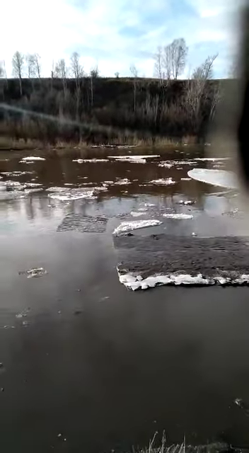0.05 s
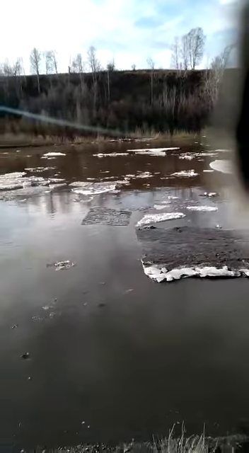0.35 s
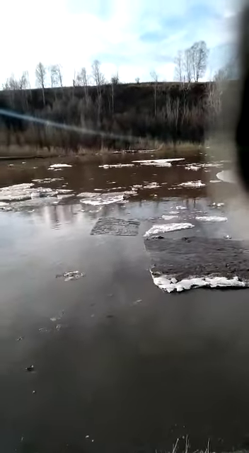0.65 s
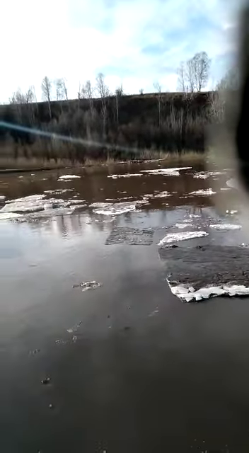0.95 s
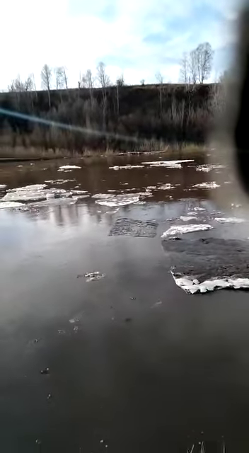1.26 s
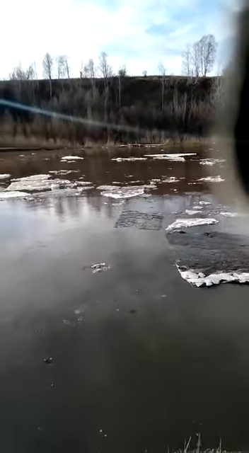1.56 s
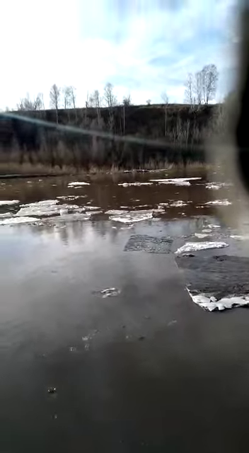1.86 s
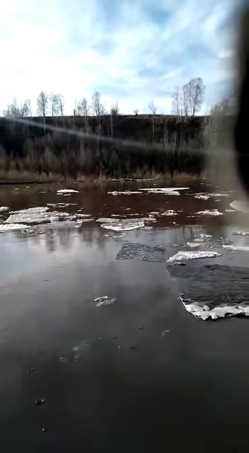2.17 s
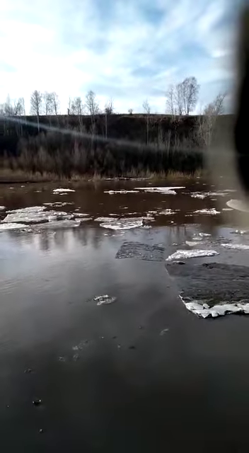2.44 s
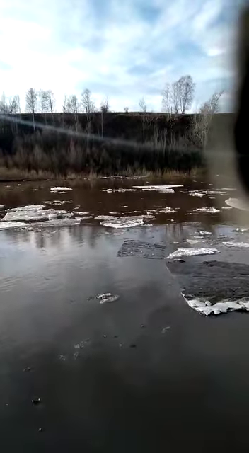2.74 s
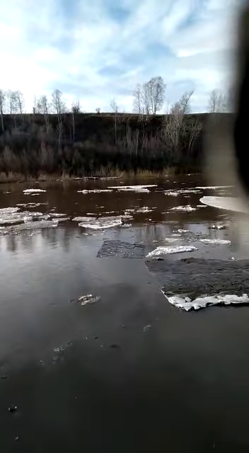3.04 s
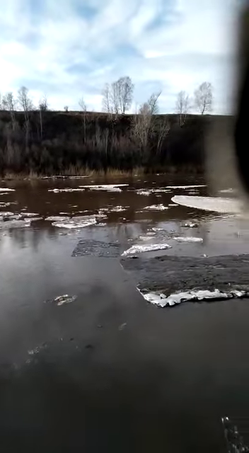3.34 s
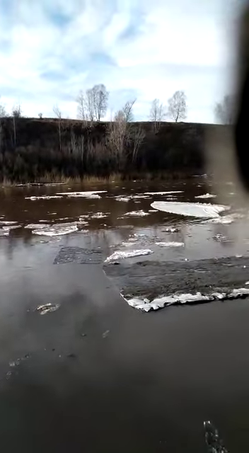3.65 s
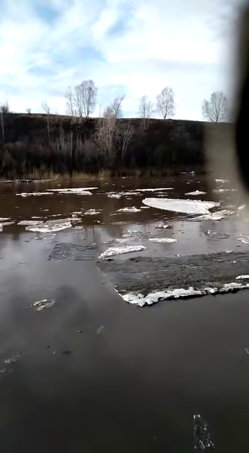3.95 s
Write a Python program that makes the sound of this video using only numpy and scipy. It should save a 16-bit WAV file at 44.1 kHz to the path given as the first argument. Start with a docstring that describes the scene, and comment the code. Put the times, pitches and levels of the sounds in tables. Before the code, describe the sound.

Low wind buffets a hand-held microphone, with soft handling noise and a very faint river.

```python
"""Gusty wind rumbles and thumps on a hand-held phone, above a slow river that carries ice.
Eddies sweep past the two microphone ports, each on its own, and a few hit as blunt buffets.
Close up, a finger rubs, knocks and ticks on the case.
Far back in the mix, small bubbles ring as drips and the river murmurs under a fine spray."""
import sys
import numpy as np
from scipy import signal
from scipy.fft import rfft, irfft
from scipy.io import wavfile
from scipy.ndimage import uniform_filter1d, map_coordinates

SR = 44100
rng = np.random.default_rng(int(sys.argv[2]) if len(sys.argv) > 2 else 0)


def file_out(sig):
    """Save sig as 16-bit WAV at sys.argv[1]."""
    # one column per channel
    cols = np.atleast_2d(sig).T
    # limit, then scale
    lim = np.clip(cols, -1, 1)
    pcm = np.round(lim * 32767).astype(np.int16)
    wavfile.write(sys.argv[1], SR, pcm)


N = 176400

# Gust envelope at each port, ahead of flicker and trim: time_s, level_db
GUSTS_LEFT = [(0, -50), (0.848, -41), (1.028, -34), (1.109, -25.5), (1.221, -34.5), (1.338, -27),
              (1.559, -38), (1.899, -28.5), (2.018, -40.5), (2.45, -50), (2.772, -36.5), (2.95, -46.5),
              (3.2, -46), (3.36, -31), (3.551, -50.5), (3.798, -29.5), (3.902, -36.5), (4, -36)]
GUSTS_RIGHT = [(0, -25), (0.118, -27.5), (0.259, -24.5), (0.698, -27), (0.952, -32), (1.25, -37),
               (1.361, -32), (1.501, -48.5), (1.651, -36), (1.802, -41), (1.989, -32), (2.079, -42),
               (2.4, -54), (2.849, -40), (3.08, -40.5), (3.399, -36.5), (3.851, -40), (4, -37.5)]
# Tone of the turbulence at a sweep speed of 1: frequency_hz, gain_db
EDDY_EQ = [(12, 1), (30, 8), (70, 1.5), (120, -3), (200, -11), (300, -22), (450, -41), (700, -53.5),
           (1400, -82.5)]
# Single vortex hits: centre_s, peak_db, half_width_s, flutter_db, pan_db (left minus right)
VORTEX_HITS = [(.008, -22.5, 0.0009, -26.5, -7.5), (0.089, -23.5, 0.0034, -57, -36),
               (0.154, -19.5, 0.001, -43, -41), (.237, -18, 0.0012, -29, -23),
               (0.2578, -14.5, 0.00092, -26, -32), (.449, -20.5, 0.00084, -45, -27),
               (0.492, -30.5, 0.00088, -47, -20), (0.672, -19, 0.0011, -34.5, -39),
               (.724, -23, 0.0011, -48, -24), (0.803, -28.5, 0.0026, -45, -12),
               (1.101, -18, .0026, -34.5, 20), (1.258, -30.5, 0.0014, -44, -19.5),
               (1.317, -17, 0.0018, -40, 29), (1.38, -25, 0.0023, -41.5, 0.5),
               (1.66, -28.5, 0.0018, -49, -10), (1.7275, -14, 0.0016, -28.5, 32.5),
               (1.873, -15.5, 0.0035, -50, 31), (1.998, -20, 0.0012, -34, -23),
               (2.12, -29.5, 0.0042, -54.5, 10), (3.202, -28.5, .002, -51, -18),
               (3.3062, -21.5, 0.0016, -42, 20), (3.391, -23, 0.0029, -49.5, 15),
               (3.7779, -12.5, 0.0019, -25.5, 23.5), (3.790, -18, .0035, -35, 29),
               (3.819, -19.5, 0.002, -39, 28), (3.972, -25, 0.0037, -56, -14.5)]
# Tone of the flutter around a vortex: frequency_hz, gain_db
FLUTTER_EQ = [(50, -2), (110, 0.5), (200, -4.5), (330, -5), (450, -17.5), (700, -32.5), (1200, -53),
              (3000, -84)]
# Finger sliding on the case: start_s, length_s, level_db, swell_db, pan_db
RUB_STROKES = [(0.062, 0.021, -72.5, -23.5, -2), (0.087, 0.024, -69.5, 6, 7), (0.176, 0.11, -59.5, 7.5, 6),
               (0.29, 0.14, -54, 5.5, 6), (0.429, 0.15, -57.5, -10, 8), (.58, 0.31, -82.5, 0.5, 9),
               (0.633, 0.0072, -68.5, 5, 11), (.657, 0.018, -65, 2.5, 10), (.685, 0.043, -66.5, 3, 8),
               (0.763, 0.031, -66.5, 3, 9), (0.801, 0.012, -72, 0, 7), (0.913, 0.1, -78, -3, 3.5),
               (1.034, 0.031, -66.5, -7, 8), (1.395, 0.015, -73.5, 1.5, 9), (2.789, 0.022, -73.5, -12, 4.5),
               (2.833, 0.065, -76, 13, 8), (2.904, 0.048, -64.5, -5, 9), (3.294, 0.15, -84, -3, 10)]
# Tone of the friction hiss: frequency_hz, gain_db
RUB_EQ = [(300, -1), (700, 3), (1100, 2), (1600, 0), (2200, 3.5), (3100, -2.5), (4300, 1), (5300, -4),
          (7200, 0.5), (8700, -9.5), (10200, -9.5), (12000, -21.5), (16000, -14.5)]
# Grip knocking on the case: start_s, level_db, decay_s, pan_db
GRIP_KNOCKS = [(.383, -41, .006, 11), (0.415, -40.5, 0.0069, 17), (1.032, -47, 0.011, 6),
               (2.782, -44, 0.0094, -6.5), (2.792, -40, 0.017, 4.5)]
# Dull body of the case: frequency_hz, gain_db
CASE_EQ = [(120, -21), (240, 8), (310, 3), (470, -6.5), (650, -6), (1000, -21), (1400, -22), (2400, -30.5),
           (3300, -34.5), (8000, -61)]
# Skin catches and case ticks: start_s, level_db, ring_hz, width_hz, decay_s, pan_db
CASE_TICKS = [(0.052, -49, 6000, 22000, 0.00068, -6), (0.061, -68, 11000, 12000, .001, -1),
              (0.278, -47, 6500, 4000, 0.0074, 11), (0.301, -41, 5200, 5900, 0.0019, 8),
              (0.3097, -38, 7400, 2200, 0.0032, 15), (0.3824, -39, 6500, 2170, .0018, 25),
              (0.384, -43.5, 1500, 3000, 0.002, 13), (0.403, -43, 6500, 4000, 0.002, 18),
              (0.4117, -39, 1460, 1800, 0.0062, 30), (0.42, -48, 6900, 5950, 0.0058, 25),
              (1.0311, -45, 760, 900, 0.0019, 15), (1.398, -66.5, 815, 1000, 0.013, 13),
              (1.69, -69.5, 5000, 5960, .003, 2.5), (2.222, -63, 4400, 1510, 0.0017, 0.5),
              (2.225, -67, 7500, 3990, 0.0014, 6), (2.785, -52, 1700, 2000, 0.0027, 13),
              (2.967, -71, 4950, 9300, 0.0015, 6), (3.343, -71.5, 5000, 6850, 0.0016, 7),
              (3.613, -72.5, 6000, 8000, 0.0005, 4), (3.748, -65, 2486, 3830, 0.001, 1.5),
              (3.857, -80.5, 3000, 3000, 0.0035, 10), (3.894, -76, 2500, 4020, 0.0015, 5)]
# Drips and bubbles: start_s, level_db, pitch_hz, decay_s
BUBBLES = [(.097, -63, 1770, 0.008), (1.052, -52.5, 1700, 0.0057), (1.503, -56, 756, 0.0056),
           (1.8, -66, 1240, 0.0073), (3.21, -59, 709, 0.0049), (3.712, -56.5, 757, 0.0049),
           (3.86, -67.5, 3110, 0.0051)]
# Murmur of the river and open valley: frequency_hz, gain_db
RIVER_EQ = [(40, 2), (150, -2), (300, -4.5), (450, -9.5), (700, -15.5), (1000, -24), (1500, -37),
            (2200, -38), (3000, -42), (4100, -39.5), (5300, -47), (7000, -45), (8500, -53), (16000, -53)]


def wind(t, gusts, speed, bass_db):
    """Eddies sweep past one port: a stronger wind is both louder and quicker."""
    flicker_db, reference_db, log_speed_per_db = 2.5, -28, 0.0392
    level_db = np.interp(t, *np.array(gusts).T) + flicker_db * wander(22)
    eddies = equalise(rng.standard_normal(N), EDDY_EQ)
    eddies /= np.sqrt(uniform_filter1d(eddies ** 2, size=4000))  # even out, so the gusts lead
    travel = np.cumsum(speed * np.exp(log_speed_per_db * (level_db - reference_db)))
    pressure = map_coordinates(eddies, [travel], mode="mirror")
    return undb(level_db) * equalise(pressure, [(10, bass_db), (45, bass_db), (110, 0.012)])


def buffets(t):
    """A vortex pushes, then sucks at a port: a blunt thump wrapped in a short flutter."""
    flutter_spread_s = 0.0086
    flutter = equalise(rng.standard_normal(N), FLUTTER_EQ)
    out = 0
    for centre_s, peak_db, half_width_s, flutter_db, pan_db in VORTEX_HITS:
        position = (t - centre_s) / half_width_s
        swing = -position / (1 + position ** 2 / 5) ** 3
        thump = undb(peak_db) * swing / swing.max()
        halo = undb(flutter_db) * flutter * np.exp(-((t - centre_s) / flutter_spread_s) ** 2 / 2)
        out += pan(pan_db) / np.sqrt(2) * (thump + halo)
    return out


def finger_rubs(t):
    """Skin slides on the case: strokes of grainy friction hiss that swell or fade."""
    edge_s, grain_db, roughness_db = 0.0041, 1.17, 2
    grain = stereo_noise(0.28) * undb(grain_db * wander(1700))
    hiss = unit_rms(equalise(grain, RUB_EQ) * undb(roughness_db * wander(120)))
    strokes = 0
    for start_s, length_s, level_db, swell_db, pan_db in RUB_STROKES:
        ease_in = (1 + np.tanh((t - start_s) / (2 * edge_s))) / 2
        let_go = (1 + np.tanh((start_s + length_s - t) / edge_s)) / 2
        ramp = np.clip((t - start_s) / length_s - .5, -.5, .5)
        strokes += pan(pan_db) * ease_in * let_go * undb(level_db + swell_db * ramp)
    return hiss * strokes


def grip_knocks(t):
    """The grip shifts and the case answers with a dull knock."""
    knocks = sum(pan(pan_db) * undb(level_db) * hit_envelope(t, start_s, decay_s)
                 for start_s, level_db, decay_s, pan_db in GRIP_KNOCKS)
    return equalise(stereo_noise(0.31), CASE_EQ) * knocks


def case_ticks(t):
    """Skin catches on the case: each tick is a crisp burst that dies in milliseconds."""
    noise = stereo_noise(0.24)
    out = 0
    for start_s, level_db, ring_hz, width_hz, decay_s, pan_db in CASE_TICKS:
        ring = resonate(noise, ring_hz, width_hz)
        out += pan(pan_db) * undb(level_db) * ring * hit_envelope(t, start_s, decay_s)
    return out


def drips(t):
    """Small bubbles ring and rise a little in pitch."""
    attack_s = 0.0025
    out = 0
    for start_s, level_db, pitch_hz, decay_s in BUBBLES:
        age = np.clip(t - start_s, 0, 20 * decay_s)
        envelope = np.minimum(age / attack_s, 1) * np.exp(-age / decay_s)
        out += undb(level_db) * envelope * np.sin(2 * np.pi * pitch_hz * age * (1 + .5 * age))
    return out


def river():
    """Slow water lays a soft bed of murmur, sprinkled with tiny splashes."""
    murmur_db, spray_db, splashes_per_s, splash_decay_s = -60.5, -93, 54, 0.0019
    murmur = equalise(stereo_noise(0.4), RIVER_EQ) * undb(murmur_db + wander(6.7))
    splashes = (rng.random(N) < splashes_per_s / SR) * undb(2.5 * rng.exponential(size=N))
    tails = signal.lfilter([1], [1, -np.exp(-1 / (splash_decay_s * SR))], splashes)
    spray = equalise(tails * stereo_noise(0.36),
                     [(500, 11.5), (2000, 4.5), (4200, -6.5), (7000, -5.5), (11000, -17.5)])
    return pan(2) * (murmur + undb(spray_db) * spray)


def hit_envelope(t, start_s, decay_s, attack_s=0.00088):
    """A snap of attack and a short decay."""
    age = np.clip(t - start_s, 0, 20 * decay_s)
    return np.minimum(age / attack_s, 1) * np.exp(-np.maximum(age - attack_s, 0) / decay_s)


def equalise(x, curve):
    """Apply an EQ curve, rolling off below its first point; rms 1."""
    hz, db = np.array(curve, float).T
    f = np.maximum(np.arange(N // 2 + 1) * SR / N, 1)
    gain = undb(np.interp(np.log(f), np.log(hz), db)) * np.minimum(f / hz[0], 1)
    return unit_rms(irfft(rfft(x) * gain, N))


def resonate(x, ring_hz, width_hz):
    """A resonance with steep skirts; rms 1."""
    f = np.maximum(np.arange(N // 2 + 1) * SR / N, 1)
    return unit_rms(irfft(rfft(x) / (1 + 1j * (f - ring_hz ** 2 / f) / width_hz) ** 2, N))


def stereo_noise(correlation):
    """White noise, part centred and part wide."""
    centre = np.sqrt(correlation) * rng.standard_normal(N)
    return centre + np.sqrt(1 - correlation) * rng.standard_normal((2, N))


def wander(rate_hz):
    """Smooth random modulation; rms 1."""
    f = np.arange(N // 2 + 1) * SR / N
    return unit_rms(irfft(rfft(rng.standard_normal(N)) / (1 + (f / rate_hz) ** 4), N))


def pan(db):
    """Stereo gains for a level difference; positive leans left."""
    return unit_rms(undb(np.array([[db], [-db]]) / 2))


def undb(db):
    return 10 ** (np.asarray(db) / 20)


def unit_rms(x):
    return x / np.sqrt(np.mean(x ** 2))


def scene():
    """Wind up front, handling noise beneath it, water at the back."""
    t = np.arange(N) / SR
    left = undb(1.0) * wind(t, GUSTS_LEFT, speed=0.72, bass_db=0)
    right = undb(-1.12) * wind(t, GUSTS_RIGHT, speed=1.2, bass_db=-2.5)
    air = np.array([left, right]) + buffets(t)
    handling = finger_rubs(t) + grip_knocks(t) + case_ticks(t)
    return air + handling + drips(t) + river()


def record(dry):
    """The phone cuts the top end steeply."""
    cutoff_hz = 15850
    return signal.sosfilt(signal.ellip(10, .2, 80, cutoff_hz, fs=SR, output="sos"), dry)


dry = scene()
out = record(dry)
file_out(out)
```